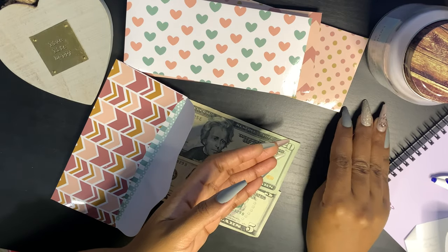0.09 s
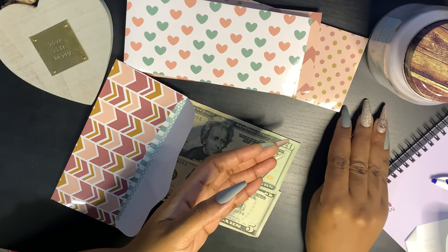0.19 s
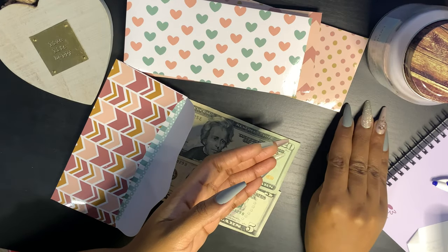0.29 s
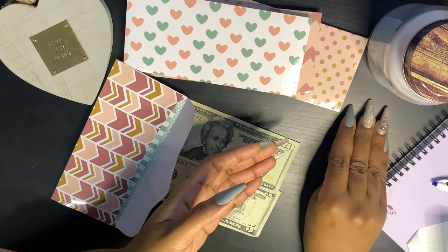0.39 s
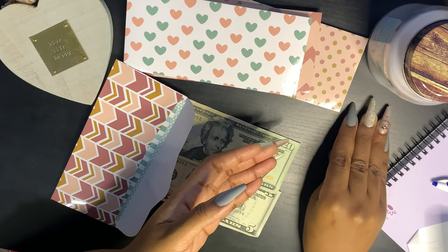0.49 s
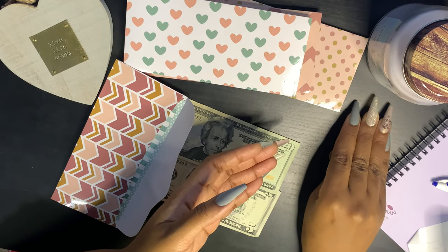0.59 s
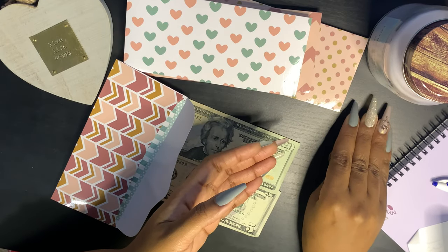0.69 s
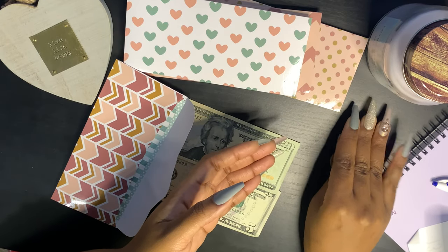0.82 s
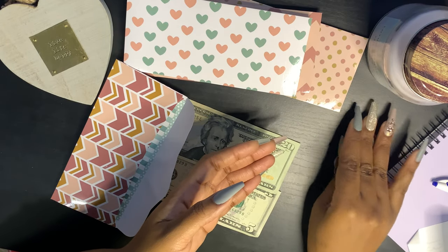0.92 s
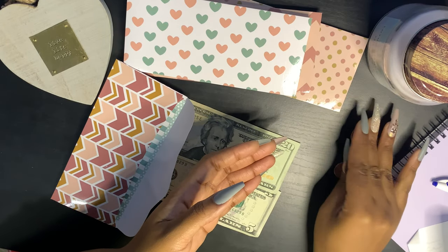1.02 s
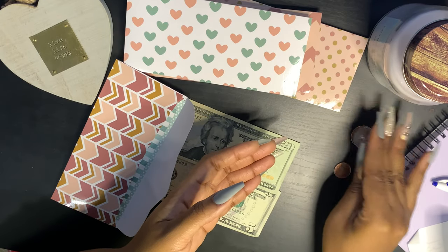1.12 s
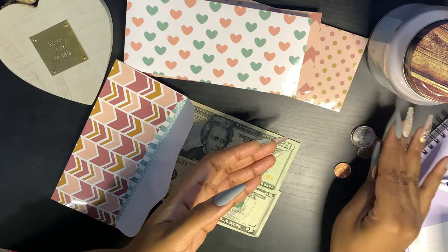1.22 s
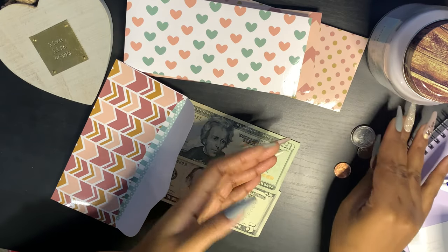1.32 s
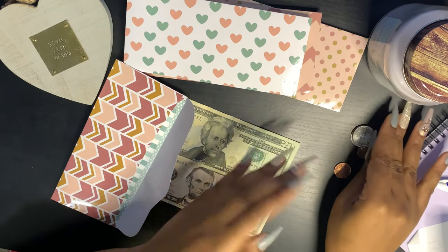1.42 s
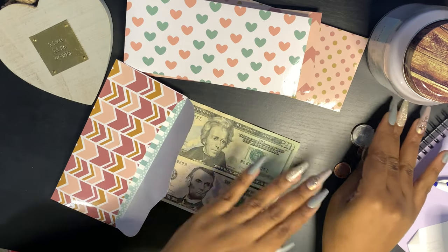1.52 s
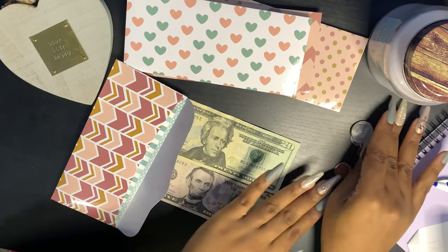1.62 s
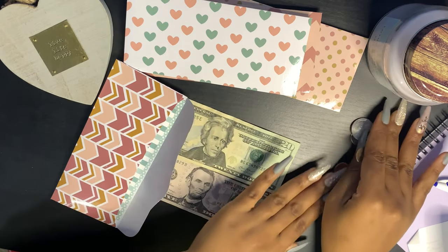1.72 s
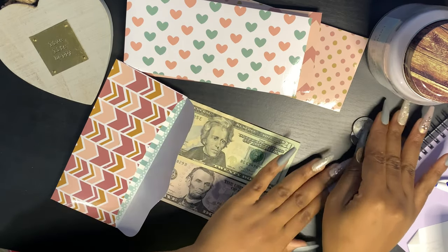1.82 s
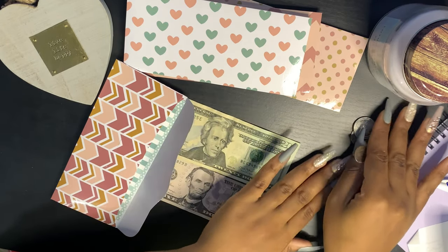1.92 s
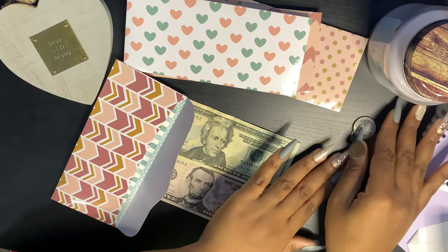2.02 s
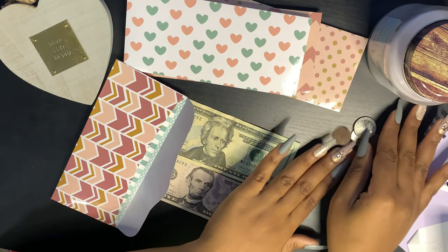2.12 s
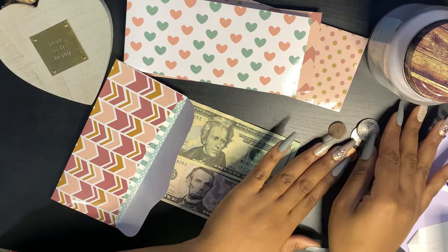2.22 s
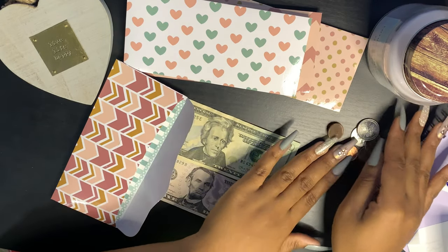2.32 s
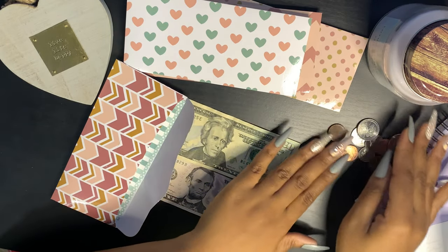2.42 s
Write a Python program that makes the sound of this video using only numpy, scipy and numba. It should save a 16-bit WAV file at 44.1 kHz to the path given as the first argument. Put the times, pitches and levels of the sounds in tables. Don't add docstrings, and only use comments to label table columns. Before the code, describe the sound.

Coins clink and scrape on a wooden tabletop after a few sharp fingernail knocks, close up indoors.

```python
import sys
import numpy as np
from scipy import signal
from scipy.fft import rfft, irfft
from scipy.io import wavfile
from scipy.ndimage import uniform_filter1d
from numba import njit

SR = 44100
rng = np.random.default_rng(int(sys.argv[2]) if len(sys.argv) > 2 else 0)


def field_ratio(decibels):
    return 10 ** (np.asarray(decibels, dtype=float) / 20)


def inscribe(sig):
    pcm = np.round(np.clip(np.atleast_2d(sig).T, -1, 1) * 32767)
    wavfile.write(sys.argv[1], SR, pcm.astype(np.int16))


N = 108045
T = np.arange(N) / SR
HZ = np.maximum(np.fft.rfftfreq(N, 1 / SR), 1)

# f/Hz, level/dB
HUSH_COLOUR = [(20, -61.5), (42, -13.5), (64, -7), (130, -18), (285, -33.5), (1500, -36.5), (5000, -46.5),
               (12000, -50)]
# f/Hz, t60/s, level/dB
ROOM = [(181, 0.2, -4), (540, 0.24, -2), (940, 0.26, 0), (1970, 0.23, -1.5), (3690, 0.25, -5),
        (7400, 0.19, -9.5), (13000, 0.1, -15.5)]
# f/Hz, right port's lead/rad, unrelated share/0-1, left over right/dB
PORTS = [(250, 0, .1, 0), (900, -2, .9, 1.5), (1700, -1.4, .8, 0), (2300, -2.2, .7, 0),
         (2900, -3.2, .6, -.5), (4400, -6.2, .7, -1.5), (5600, -6.5, .9, -3.5), (7000, -5.2, .02, -.5),
         (16000, 6.3, .015, 0)]
SCATTER_LAGS_MS = [.61, 1.7, 2.9, 4.3]
# f/Hz, level/dB, t60/s
BOARD = [(353, -16, 0.052), (418.7, 2.5, 0.056), (630, -20, .04), (723.6, -1.5, 0.05), (859.6, -4, 0.04),
         (926, -4, 0.055), (1007, -2, 0.064), (1238, -14, 0.045), (1386, -4, .05), (1671, -5.5, 0.088),
         (2022, -7.5, .05)]
# f/Hz, level/dB, t60/s
COINS = [(9480, -9, 0.028), (9970, 3.5, 0.0052), (10870, -8.5, 0.0067), (12100, 0, 0.0078),
         (14100, -4.5, 0.016), (15180, 2, 0.014), (15600, -6.5, 0.012)]
# f/Hz, level/dB
THUD_COLOUR = [(200, -20.5), (400, 1.5), (600, -8.5), (900, -1), (1700, 5), (2300, -11)]
# f/Hz, level/dB
GRIT_COLOUR = [(300, -12.5), (1000, -14.5), (2200, 3.5), (4300, -1), (5800, -8), (9500, -5), (13000, -7),
               (16000, -12.5)]
# f/Hz, width/Hz, level/dB
RIM = [(970, 620, -10), (1760, 90, -4.5), (1977, 41, 5.5), (3364, 41, -3), (3830, 1800, 6.5),
       (4400, 540, 6.5), (6105, 400, 4), (7520, 1500, 1.5), (11150, 2000, -14)]
# t/s, level/dB
WOBBLES = [
    (2.115, -28.5),
    (2.195, -33),
    (2.262, -36.5),
    (2.332, -37.5),
    (2.387, -35.5),
    (2.447, -31),
]
# t/s, level/dB
SLIDES = [
    [(.63, -66), (.685, -49.5), (.72, -60), (.77, -83)],
    [(.18, -56), (.2, -43.5), (.210, -23.5), (.218, -26), (.26, -56), (.385, -70.5), (.398, -45.5),
     (.407, -37.5), (.42, -59.5)],
    [(.778, -61), (.815, -31), (.836, -29), (.86, -42), (.92, -72), (.94, -46), (1.08, -57), (1.13, -50.5),
     (1.19, -100)],
    [(1.352, -63), (1.37, -44.5), (1.46, -56), (1.49, -46.5), (1.62, -54)],
    [(1.62, -46.5), (1.68, -22.5), (1.715, -30), (1.727, -35), (1.765, -24.5), (1.83, -35.5), (1.88, -36),
     (1.96, -48)],
    [(1.968, -29.5), (2.03, -42), (2.05, -34.5), (2.12, -44), (2.15, -41), (2.2, -46.5), (2.24, -76)],
]
SLIDE_BOARD_DB = [-11.5, -11.5, -9.5, -5, -13.5, -13]
SLIDE_DEEP_DB = [-30, -14.5, -26, -32, -11.5, -17.5]
# t/s, level/dB, f/Hz, t60/s
PINGS = [(.147, -41.5, 1574, 0.019), (0.2085, -20.5, 2600, 0.015), (0.408, -17.5, 7800, 0.011),
         (0.409, -18.5, 4380, 0.0085), (.411, -14, 1710, 0.012), (.217, -34, 290, 0.17),
         (.222, -36.5, 93, 0.17), (.411, -30.5, 207, 0.04), (2.048, -38, 212, 0.13),
         (2.0345, -17, 11400, 0.0048), (2.045, -10, 4400, 0.0078), (2.046, -17, 6100, 0.0074),
         (2.0705, -19, 8200, 0.0035), (.412, -26.5, 420, .05), (.298, -33.5, 1000, .03),
         (1.13, -50, 700, 0.056), (.8, -41, 215, 0.055), (.838, -38, 395, 0.045),
         (1.467, -29, 2050, 0.0091), (.217, -24, 415, 0.041), (.217, -22, 1680, .02),
         (2.44, -38.5, 420, 0.027), (.216, -18, 1010, 0.034), (2.08, -42, 222, 0.076)]
# t/s, level/dB, f/Hz, t60/s
RINGS = [(.701, -62, 3230, 0.022), (.985, -52, 9230, .15), (1.628, -43, 9450, .1),
         (1.698, -32.5, 9400, 0.23), (2.095, -46, 13000, .06), (.984, -36, 15350, .05),
         (1.678, -22, 14750, 0.045), (1.677, -26, 12100, 0.033), (1.696, -22, 15100, .07),
         (1.735, -32, 15300, .08), (1.758, -28, 15000, .04), (1.777, -23, 15100, 0.07),
         (1.802, -24, 15320, .05), (1.822, -29, 15300, 0.12), (1.97, -34, 15600, .12),
         (2.06, -36, 15200, 0.036), (2.078, -30, 15300, .04), (2.079, -22.5, 9500, 0.017)]
# t/s, peak level/dB, board level/dB, coin ring level/dB
KNOCKS = [
    (0.145, -36.5, -16.5, -35),
    (0.207, -21.5, -21, -32.5),
    (0.2105, -12, -21.5, -19.5),
    (0.216, -16.5, -5, -38.5),
    (0.2195, -22.5, -0.5, -30.5),
    (0.252, -21.5, -22, -15.5),
    (0.297, -38, 1, -44),
    (0.409, -7.5, -15, -40.5),
]
# t/s, peak level/dB, board level/dB, coin ring level/dB
NUDGES = [(0.799, -27.5, -12.5, -0.5), (0.828, -26, -18, -5), (0.837, -19.5, -11, -3),
          (0.845, -27, -23, -2), (0.87, -24.5, -41, -13), (0.927, -26, -17.5, -40),
          (0.945, -31.5, -10.5, -32), (0.984, -28.5, -8, -30), (1.098, -35, -13, -1.5),
          (1.365, -29.5, -14, 1), (1.392, -33, -13.5, 1), (1.414, -38, -27, 5), (1.467, -45, 4, -32),
          (1.48, -28, -14, -17), (1.514, -36, -21, 3)]
# t/s, peak level/dB, board level/dB, coin ring level/dB
CLINKS = [(1.655, -22.5, -14.5, -8), (1.678, -16, -36, -6), (1.697, -26, -10, -2.5),
          (1.761, -16.5, -36, -17), (1.774, -14, -38, -19), (1.802, -17.5, -27, -4),
          (1.806, -14.5, -29, -5.5), (1.822, -24, -15, -5), (1.827, -26, -17, -5),
          (1.855, -17.5, -33, -9.5), (1.969, -15, -21, -30), (2.031, -28.5, -31, -20),
          (2.046, -9, -18, -37), (2.051, -24.5, -4, -25), (2.061, -24, -18.5, -20), (2.079, -17, -17, -14),
          (2.083, -15.5, -22, -15), (2.1, -21, -23, -23), (2.165, -26, -48, -12)]


def unit(x):
    return x / np.sqrt(np.mean(x ** 2) + 1e-30)


def fade_60(t, t60):
    return np.exp(-np.log(1000) * t / t60)


def butter(x, order, hz, kind="low"):
    return signal.sosfilt(signal.butter(order, hz, kind, fs=SR, output="sos"), x)


def colour(x, points):
    hz, db = np.array(points, float).T
    log_hz = np.log(np.fft.rfftfreq(2048, 1 / SR) + 1)
    cepstrum = irfft(np.interp(log_hz, np.log(hz), db) * np.log(10) / 20)
    cepstrum[1:1024] *= 2
    cepstrum[1025:] = 0
    response = irfft(np.exp(rfft(cepstrum)))[:1024]
    return signal.fftconvolve(x, response)[:len(x)]


def flatten(x, bins):
    spectrum = rfft(x)
    return spectrum / np.sqrt(uniform_filter1d(abs(spectrum) ** 2, size=bins))


def even(x):
    y = irfft(flatten(x, 35), len(x))
    return y * np.sqrt(np.sum(x ** 2) / np.sum(y ** 2))


def walk(rate):
    hold = int(SR / rate)
    steps = np.repeat(rng.standard_normal(N // hold + 1), hold)
    return 1.2 * uniform_filter1d(steps, hold)[:N]


@njit
def spin(x, turn, fade):
    y, z = np.empty(len(x)), 0j
    for i in range(len(x)):
        z = z * fade * np.exp(1j * turn[i]) + x[i]
        y[i] = z.imag
    return y


def ring(x, hz, t60):
    turn = 2 * np.pi * (hz + 0 * T) / SR
    fade = np.exp(-np.log(1000) / (max(t60, .002) * SR))
    return spin(x + 1e-18, turn, fade) / np.sqrt(SR / 200)


def hush():
    air = field_ratio(-68) * unit(colour(rng.standard_normal(N), HUSH_COLOUR))
    tail = colour(rng.standard_normal(N), [(200, 11.0), (600, -6), (2000, 10.5), (5000, -18.0)])
    return air + field_ratio(-63) * fade_60(T, 0.96) * tail


def room(x):
    t, tail = T[:SR // 2], 0
    for hz, t60, db in ROOM:
        fade = fade_60(t, t60) * np.clip(t / 0.0027, 0, 1)
        echo = irfft(flatten(rng.standard_normal(len(t)) * fade, 21), len(t))[:len(t) * 3 // 4]
        tail = tail + field_ratio(db) * butter(echo, 2, [hz / 1.41, min(hz * 1.41, .45 * SR)], "band")
    return signal.fftconvolve(x, tail)[:N]


def nearby(x):
    for ms in SCATTER_LAGS_MS:
        a = np.r_[1, np.zeros(int(ms * SR / 1000)), -.45]
        x = signal.lfilter(a[::-1], a, x)
    return x


def ports(near, shared, left, right):
    table_hz, *columns = np.array(PORTS).T
    lead, own, pan_db = (np.interp(HZ, table_hz, column) for column in columns)
    direct = np.sqrt(1 - own / 2) * rfft(near)
    scatter = np.sqrt(own / 2) * rfft(nearby(near))
    common = np.sqrt(1 - own) * rfft(shared)

    def port(own_sound, side):
        heard = (direct + side * scatter + common) * np.exp(-.5j * side * lead)
        heard = heard + np.sqrt(own) * rfft(own_sound)
        return irfft(heard * field_ratio(side * pan_db / 2), N)

    return np.array([port(left, 1), port(right, -1)])


def body(modes, force, scatter_db, drift, rate):
    total = 0
    for hz, db, t60 in modes:
        push = force * field_ratio(scatter_db * walk(rate))
        total = total + field_ratio(db) * ring(push, hz * (1 + drift * walk(30)), t60)
    return total


def thud(force):
    fall_s = 0.0093
    tail = flatten(rng.standard_normal(4096) * np.exp(-T[:4096] / fall_s), 9)
    tail = irfft(tail)[:3000] * np.sqrt(fall_s * SR / 2)
    return field_ratio(-10.5) * colour(signal.fftconvolve(force, tail)[:N], THUD_COLOUR)


def grit():
    grains_per_s, scatter_db = 7000, 2.5
    on = rng.random(N) < grains_per_s / SR
    size = field_ratio(scatter_db * np.minimum(rng.exponential(size=N), 4))
    return unit(on * rng.standard_normal(N) * size)


def wobble():
    rise_s, fall_s, rest_db = 0.0055, 0.0057, -56.5
    swell = field_ratio(rest_db) * (T > WOBBLES[0][0])
    for s, db in WOBBLES:
        swell = swell + field_ratio(db) * np.exp(-np.where(T < s, (s - T) / rise_s, (T - s) / fall_s))
    rub = butter(grit(), 2, [400, 9500], "band")
    rim = sum(field_ratio(db) * unit(ring(rub, hz, 2.33 / width)) for hz, width, db in RIM)
    return swell * unit(rim)


def slides():
    level_db, patchy_db, ring_db = -5.5, 2.5, -5.5
    force, rub = np.zeros((4, N)), grit()
    for k, rows in enumerate(SLIDES):
        s, db = np.array(rows).T
        pressure_db = np.interp(T, s, db, left=-120, right=-120)
        push = field_ratio(pressure_db + level_db + patchy_db * walk(90)) * rub
        if k == 0:
            push = butter(push, 3, 1166) * 3
        coin_db = ring_db - 30 * (k < 2)
        force += push * field_ratio(np.array([[0], [SLIDE_BOARD_DB[k]], [coin_db], [SLIDE_DEEP_DB[k]]]))
    return force


def pings():
    rise_s = 0.000083
    out = np.zeros(N)
    for s, db, hz, t60 in list(PINGS) + list(RINGS):
        near = slice(int(s * SR), int((s + 1.2 * t60) * SR))
        u = np.maximum(T[near] - s, 0)
        shape = (1 - np.exp(-u / rise_s)) * fade_60(u, t60)
        out[near] += field_ratio(db) * shape * np.sin(2 * np.pi * hz * u)
    return out


def contacts():
    rise_s, fall_s, blow_db = 0.00079, 0.0019, 14.5
    tick_db, thump_db, coin_db = -3, 1, 2
    force, grain = np.zeros((3, N)), np.clip(rng.standard_normal(N), -2, 2)
    for s, db, board_db, ring_db in list(KNOCKS) + list(NUDGES) + list(CLINKS):
        near = slice(int(s * SR) - 500, int(s * SR) + 2000)
        u = T[near] - s
        swell = np.exp(-np.where(u > 0, u / fall_s, -u / rise_s))
        push = even(swell * grain[near]) * np.array([[1], [.4], [1]])
        push[:, 500] += field_ratio(blow_db) * np.array([.3, 1, .3])
        force[:, near] += push * field_ratio(db + np.array([[tick_db], [thump_db + board_db], [coin_db + ring_db]]))
    return force


def scene():
    hit, slide, tones = contacts(), slides(), pings()
    on_air, on_board, on_coins = hit + slide[:3]
    dry = colour(on_air, GRIT_COLOUR) + wobble() + tones + thud(on_board)
    dry = dry + ring(slide[3], 213, .06)
    dry = dry + body(BOARD, on_board, 3, .012, 24.98)
    dry = dry + body(COINS, on_coins, 4, .008, 11.0)
    dry = butter(dry, 3, 127, "high")
    to_room = dry - .6 * tones
    return ports(dry, *(room(to_room) + hush() for _ in range(3)))


def band_limit(x):
    return signal.sosfilt(signal.butter(12, 17170, fs=SR, output="sos"), x)


def record(dry):
    top_cut = signal.ellip(8, .2, 70, 15900, fs=SR, output="sos")
    mix = signal.sosfilt(top_cut, dry)
    return band_limit(mix)


dry = scene()
out = record(dry)
inscribe(out)
```